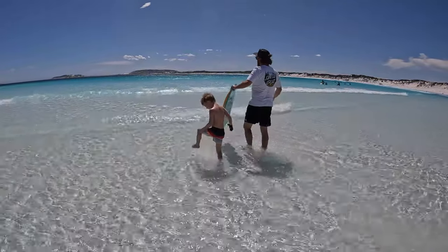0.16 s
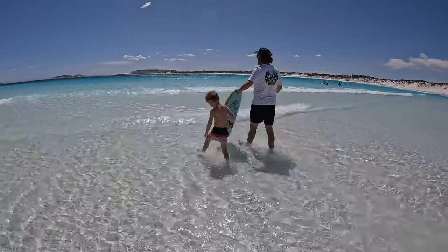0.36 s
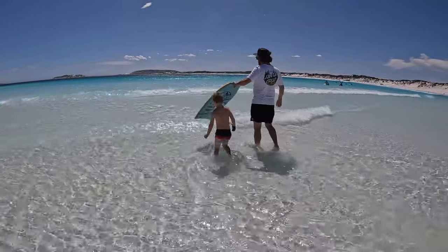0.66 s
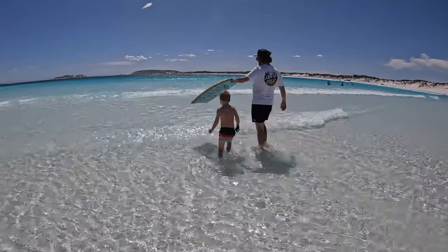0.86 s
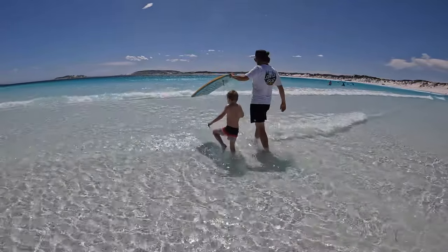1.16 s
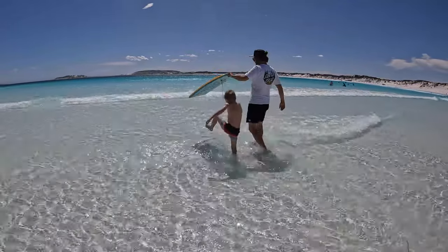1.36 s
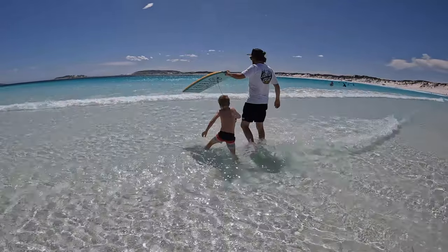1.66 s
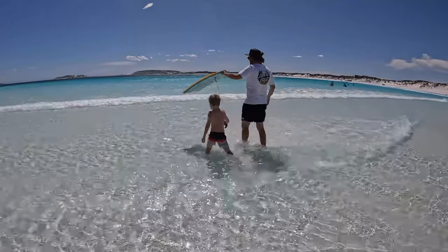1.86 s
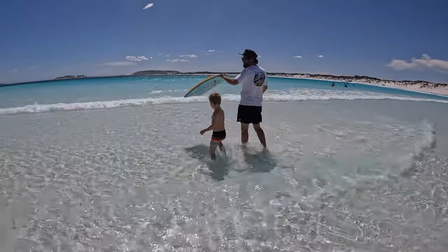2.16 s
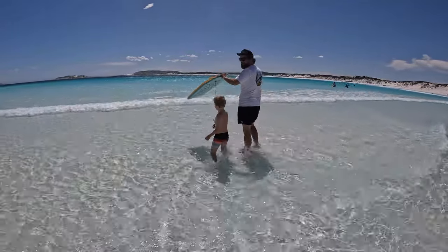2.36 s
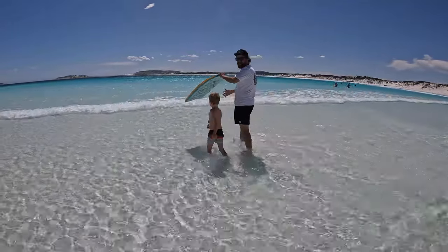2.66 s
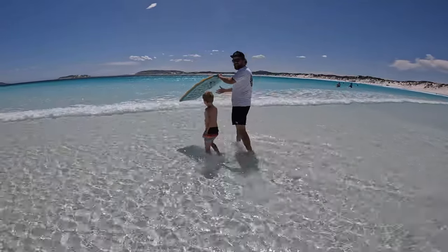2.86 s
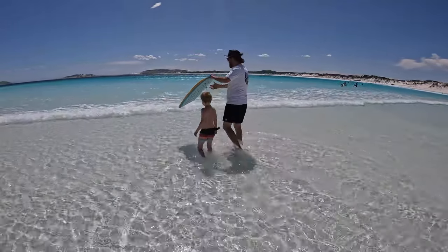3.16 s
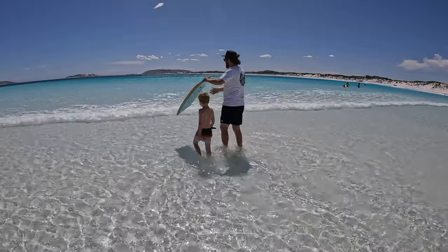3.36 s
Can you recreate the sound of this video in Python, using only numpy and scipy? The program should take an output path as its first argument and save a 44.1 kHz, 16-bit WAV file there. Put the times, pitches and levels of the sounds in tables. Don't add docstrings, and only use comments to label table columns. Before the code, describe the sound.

Legs churn shallow sea at a beach, close to a sealed, dull-topped microphone. Hollow gurgling wind flutter, low thumps, bubbles and plinking drops crowd the first second, then thin out over faint surf hiss.

```python
import sys
import numpy as np
from scipy import signal
from scipy.fft import rfft, irfft, next_fast_len
from scipy.io import wavfile
from scipy.ndimage import uniform_filter1d, map_coordinates

SR = 44100
rng = np.random.default_rng(int(sys.argv[2]) if len(sys.argv) > 2 else 0)


def volts(x):
    e = np.asarray(x, float) / 20
    return 10 ** e


def unload_audio(sound):
    columns = np.transpose(np.atleast_2d(sound))
    steps = np.round(np.clip(columns, -1, 1) * 32767)
    wavfile.write(sys.argv[1], SR, steps.astype(np.int16))


N = 154350


def unit(x):
    return x / np.sqrt(np.mean(x ** 2) + 1e-20)


def along(points, hz):
    f, v = np.transpose(points)
    return np.interp(np.log(hz + 1), np.log(f + 1), v)


def curve(rows, column=1):
    return np.interp(np.arange(N) / SR, np.array(rows)[:, 0], np.array(rows)[:, column])


def wobble(rate):
    return map_coordinates(rng.standard_normal(2000), [np.arange(N) * rate / SR])


def filtered(x, gain):
    m = next_fast_len(N + 8192)
    return irfft(rfft(x, m) * gain(np.fft.rfftfreq(m, 1 / SR)), m)[:N]


def highpass(corner_hz, order):
    return lambda hz: 1 / (1 + (corner_hz / (hz + 1)) ** order)


def rush(spectrum, patchy_db, wide, long):
    z = signal.stft(rng.standard_normal(N), nperseg=512)[2]
    field = uniform_filter1d(rng.standard_normal(z.shape), wide, axis=0)
    field = uniform_filter1d(field, long, axis=1)
    x = signal.istft(z * volts(patchy_db * unit(field)), nperseg=512)[1][:N]
    return unit(filtered(x, lambda hz: volts(along(spectrum, hz))))


def lay(s, rows):
    at = np.round(s * SR).astype(int)[:, None] + np.arange(rows.shape[1])
    return np.bincount(np.clip(at, 0, N).ravel(), rows.ravel(), N + 1)[:N]


def wavelets(table, cycles, delay_s, onset=1):
    s, db, hz = np.transpose(table)
    half = 1500
    turns = np.arange(-half, half) / SR * hz[:, None]
    spread = cycles * np.where(turns < 0, onset, 1)
    shape = np.cos(2 * np.pi * turns + 0.78) / np.cosh(2 * turns / spread)
    return lay(s + delay_s - half / SR, volts(db)[:, None] * shape)


def bubbles(s, db, hz, cycles, size):
    turns = np.arange(size) / SR * hz[:, None]
    life = turns / cycles
    rise = 1 + 0.025 * np.minimum(life, 2) / 2
    fade = np.exp(-2.3 * life) * (1 - np.exp(-life / 0.23))
    return lay(s, volts(db)[:, None] * np.sin(2 * np.pi * turns * rise) * fade)


# t/s, length/s, flutter level/dB, leak level/dB
GUST_TIMES = [(0.107, 0.047, 2.5, 7), (0.162, 0.13, 4.5, 8.5), (0.374, 0.14, 1.5, 3),
              (0.468, 0.07, 1.5, 12.5), (0.616, 0.055, 1.5, 10), (0.692, 0.033, 4.5, 13),
              (0.739, 0.067, 4, 3.5), (0.98, 0.082, 5, -3), (1.093, 0.084, 7, 15), (1.18, 0.13, 1, 15.5),
              (1.34, 0.028, -1, 9), (1.47, 0.077, 4, 9), (1.588, 0.043, 5.5, 11), (1.68, 0.047, 5, 17),
              (1.844, 0.12, 4.5, 6), (2.003, 0.0086, 3, 13), (2.05, 0.033, 11, -17),
              (2.093, 0.064, 6.5, -8), (2.196, 0.1, 4, -2.5), (2.324, 0.04, 4.5, 5),
              (2.43, 0.065, 5.5, 6.5)]


def gusts(column):
    t, total = np.arange(N) / SR, 0
    edge = lambda u: .5 + .5 * np.tanh(u)
    rise_s, fall_s = 0.0098, 0.018
    for row in np.array(GUST_TIMES):
        start, end = row[0], row[0] + row[1]
        total = total + row[column] * edge((t - start) / rise_s) * edge((end - t) / fall_s)
    return total


# t/s, flutter level/dB, level leaking under the filter/dB
WIND_LEVEL = [
    (0.0, -21.5, -42.5),
    (.09, -19.5, -44),
    (1.21, -22, -45),
    (3.5, -33, -63),
]
# f/Hz, level/dB per Hz
PORT_COLOUR = [(320, -30), (350, -8), (500, -3), (555, 1), (700, -3.5), (860, -4.5), (960, -14.5),
               (1600, -53.5)]


def flutter():
    lumpy = np.clip((curve(WIND_LEVEL) + 36) / 12, 0, 1)
    swing_db = lumpy * (0.2 * wobble(11.6) + 1.8 * wobble(60))
    tumble = unit(volts(swing_db) * rush(PORT_COLOUR, patchy_db=0.37, wide=2, long=5))
    return volts(curve(WIND_LEVEL) - 6.5 + gusts(2)) * filtered(tumble, highpass(230, 4))


# f/Hz, level/dB per Hz
RUMBLE_COLOUR = [(20, -53), (60, -26.5), (130, -10.5), (220, -3.5), (315, -2.5), (345, 4), (470, 1),
                 (750, -55)]


def rumble():
    swing_db = 1.0 * wobble(19) + 2.4 * wobble(50)
    leak = unit(volts(swing_db) * rush(RUMBLE_COLOUR, patchy_db=0.85, wide=2, long=4))
    return volts(curve(WIND_LEVEL, 2) + 4.0 + gusts(3)) * leak


# f/Hz, level/dB per Hz
SURF_COLOUR = [(200, -51), (600, -0.5), (1000, 3), (1450, -6.5), (2200, -4), (3800, -4), (5500, -12.5),
               (8300, -27.5)]


def surf():
    return volts(1.1 * wobble(5.12)) * rush(SURF_COLOUR, patchy_db=1.53, wide=6, long=12)


def fizz():
    per_s, life_s = 1900, 0.01
    draw = rng.random((7000, 3))
    s = np.cumsum(-np.log(draw[:, 0])) / per_s
    hz = 1700 * (12000 / 1700) ** draw[:, 1]
    clumps = map_coordinates(rng.standard_normal((12, 400)), [11 * draw[:, 1], 11 * s], order=1)
    db = np.minimum(-3.2 * np.log(draw[:, 2]), 8) + 4.8 * clumps
    raw = bubbles(s, db, hz, life_s * hz[:, None], size=700)

    def colour(f):
        tilt_db = 3.6 * np.log2(f / 3000 + .01)
        peak_db = np.exp(-(np.log(f / 3670 + 0.009) / 0.083) ** 2)
        return volts(along(SURF_COLOUR, f) + tilt_db + peak_db)
    return unit(filtered(raw, colour))


# t/s, level/dB
CHURN_LEVEL = [(0, -36), (.14, -33.5), (.25, -33), (.36, -32), (.47, -30), (.56, -32), (.66, -34),
               (.77, -31.5), (.86, -34), (1.04, -32), (1.12, -33), (1.2, -32.5), (1.4, -37), (1.65, -36),
               (2.2, -37), (2.6, -39.5), (3.1, -43.5), (3.5, -42)]


def churn():
    level_db = curve(CHURN_LEVEL)
    share = volts(0.5 + level_db - level_db.max())
    water = volts(level_db) * (surf() + share * fizz()) / np.sqrt(1 + share ** 2)
    spray = filtered(water, highpass(7360, 8))
    swing_db = 2.5 * np.sqrt(share / share.max()) * wobble(39.9)
    return water + spray * (volts(swing_db) - 1)


# t/s, peak level/dB, f/Hz
STRAY_EDDIES = [
    (.018, -18.5, 420),
    (.036, -17, 384),
    (.06, -19, 770),
    (1.408, -20, 640),
    (2.204, -20.5, 510),
]
# t/s, peak level/dB, f/Hz
DEEP_EDDIES = [(0.1132, -15.5, 460), (0.1911, -15, 416), (0.213, -8, 520), (0.3392, -13, 520),
               (0.3652, -17, 540), (0.5193, -16.5, 413), (0.6555, -13, 545), (0.6715, -18, 510),
               (0.7054, -10.5, 484), (0.7558, -12.5, 534), (0.8311, -12, 538), (1.1085, -14, 470),
               (1.1604, -23, 364), (1.1968, -12, 360), (1.2083, -18.5, 362), (1.2372, -11, 400),
               (1.2866, -12.5, 506), (1.4876, -16.6, 527), (1.7056, -13.8, 495), (1.7371, -13.7, 480),
               (2.0054, -12, 553), (2.7128, -5.5, 523)]
# t/s, peak level/dB, f/Hz
PORT_EDDIES = [(0.1322, -13.5, 880), (0.1322, -13, 581), (0.1596, -12, 670), (0.1601, -7.5, 850),
               (0.1846, -10.5, 840), (0.1906, -13, 592), (0.1976, -14, 870), (0.232, -13, 580),
               (0.2325, -13.5, 840), (0.2489, -13.0, 550), (0.2724, -10.7, 587), (0.2953, -10.5, 690),
               (0.3193, -16.6, 790), (0.3667, -11, 855), (0.4081, -10, 590), (0.4136, -11.5, 825),
               (0.4295, -16.5, 795), (0.4385, -9.5, 600), (0.4684, -17, 726), (0.4814, -15, 592),
               (0.5602, -10, 765), (0.5946, -17.5, 703), (0.6316, -17.5, 585), (0.644, -16, 570),
               (0.7024, -14.5, 680), (0.7558, -15, 766), (0.7658, -15, 740), (0.861, -13.5, 540),
               (0.8985, -15, 799), (0.9359, -18, 586), (0.9942, -8.5, 612), (1.0322, -9.5, 581),
               (1.0376, -16.5, 824), (1.0621, -10, 753), (1.092, -10, 610), (1.107, -11, 818),
               (1.1344, -15, 560), (1.1419, -10, 820), (1.1539, -18, 829), (1.1539, -12, 580),
               (1.2551, -13.1, 570), (1.3474, -16.5, 818), (1.3584, -11.5, 796), (1.4986, -12, 757),
               (1.5225, -16, 582), (1.6897, -17.6, 866), (1.8483, -17.5, 861), (1.8922, -19.6, 750),
               (1.9087, -18.5, 610), (2.0583, -13, 554), (2.0952, -9, 558), (2.1207, -13, 536),
               (2.1257, -19.5, 655), (2.1366, -13, 654), (2.3866, -19.0, 592), (2.4589, -20, 540)]


def eddies():
    rings = 0
    for table, life_s in ((STRAY_EDDIES, 0.0069), (DEEP_EDDIES, 0.0059), (PORT_EDDIES, 0.0069)):
        cycles = life_s * np.array(table)[:, -1:]
        rings = rings + wavelets(table, cycles, delay_s=-0.00096, onset=0.53)
    return volts(-3.78) * filtered(rings, lambda hz: 1 / (1 + (hz / 987) ** 12))


# f/Hz, level/dB
MIC_TOP = [(7500, 2), (8800, -8.5), (10000, -7.5), (11500, -16.5), (13000, -27), (14500, -42.5),
           (16000, -67.5)]
# t/s, peak level/dB, f/Hz
SPRAY_TICKS = [(.089, -59, 11800), (.485, -57, 10200), (.49, -53, 12400), (.608, -50, 10200),
               (.7475, -42, 12500), (.748, -50, 13500), (.925, -42, 9800), (.93, -62, 12500),
               (1.545, -47, 9450), (1.617, -34.5, 10800), (1.618, -48, 12800), (1.877, -49.5, 8800),
               (1.886, -58, 14500), (1.863, -66, 13900), (2.1, -54, 11800)]


def ticks():
    at, db, pitch = np.transpose(SPRAY_TICKS)
    return bubbles(at, db - along(MIC_TOP, pitch), pitch, 20, size=300)


# t/s, peak level/dB, f/Hz
WIND_THUMPS = [(0.093, -18, 200), (0.181, -19, 200), (0.223, -27, 190), (0.363, -31, 150),
               (0.486, -21, 125), (0.624, -17, 170), (0.772, -35, 150), (0.898, -29, 150),
               (1.094, -36, 150), (1.159, -21, 150), (1.182, -24.5, 230), (1.241, -42, 150),
               (1.363, -37, 150), (1.443, -28, 150), (1.586, -24, 150), (1.679, -29, 200),
               (1.839, -29, 190), (2.309, -47, 150), (2.775, -33, 150)]


def thumps():
    return filtered(wavelets(WIND_THUMPS, 0.52, delay_s=0.01488), highpass(95, 2.9))


# t/s, peak level/dB, f/Hz
STRIDE_BUBBLES = [(0.1204, -19, 4037), (0.1474, -14.5, 3180), (0.2021, -15, 1460), (0.2797, -22, 4745),
                  (0.28, -17, 1194), (0.3163, -32, 3130), (0.3555, -21, 4020), (0.3599, -23.1, 2017),
                  (0.3901, -18, 1133), (0.3965, -21, 2230), (0.408, -22.5, 3900), (0.42, -28, 3078),
                  (0.4647, -18, 3470), (0.4705, -29, 4950), (0.4868, -16, 3540), (0.5041, -22, 4660),
                  (0.514, -16, 3825), (0.5262, -28, 4928), (0.7287, -18, 2670), (0.7291, -21, 2380),
                  (0.733, -18, 1270), (0.7527, -19, 2150), (0.779, -20.9, 2926), (0.7963, -20, 3300),
                  (0.8465, -21, 2212), (0.9638, -21.9, 2178), (1.0257, -19, 2220), (1.0401, -24.2, 3020),
                  (1.0566, -18, 3221), (1.169, -16, 3860), (1.2282, -25, 3970)]


def splash():
    at, db, pitch = np.transpose(STRIDE_BUBBLES)
    life_s = 0.0091
    return bubbles(at, db - 3.5, pitch, life_s * pitch[:, None], size=700)


# t/s, peak level/dB, f/Hz
DRIPS = [(0.157, -12, 1570), (0.361, -16.5, 1050), (0.454, -12.5, 2800), (.478, -17, 1960),
         (0.589, -17.5, 3600), (0.865, -20, 3680), (1.055, -15, 4000), (1.59, -20, 1980),
         (1.617, -20.5, 4430), (1.622, -17.5, 1130), (2.081, -15.5, 4040), (2.248, -14, 2270),
         (2.275, -19.5, 1235), (2.642, -31, 1270), (2.644, -32, 3940)]


def drops():
    at, db, pitch = np.transpose(DRIPS)
    twin_s, twin_db, twin_up = 0.0076, -7, 1.032
    s, level_db = np.r_[at, at + twin_s], np.r_[db, db + twin_db]
    return bubbles(s, level_db, np.r_[pitch, pitch * twin_up], 10.4, size=1500)


def scene():
    wind = flutter() + rumble() + eddies() + thumps()
    water = churn() + ticks() + splash() + drops()
    return (wind + water)[None]


def band_limit(x):
    return signal.sosfilt(signal.butter(12, 14770, fs=SR, output="sos"), x)


def record(dry):
    ceiling, notch_hz, notch_width_hz = 0.49, 9030, 160
    soft = dry[0] / (1 + np.abs(dry[0] / ceiling) ** 4) ** .25
    notch = lambda hz: 1 - 1 / (1 + ((hz - notch_hz) / notch_width_hz) ** 4)
    heard = filtered(soft, lambda hz: volts(along(MIC_TOP, hz)) * notch(hz))[None]
    return band_limit(heard)


dry = scene()
out = record(dry)
unload_audio(out)
```